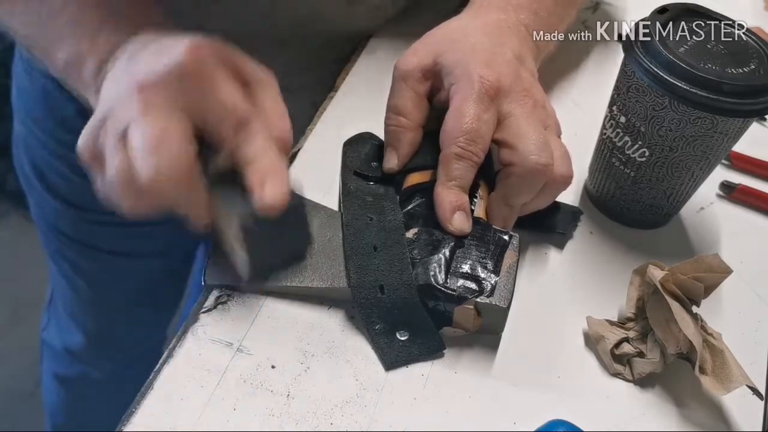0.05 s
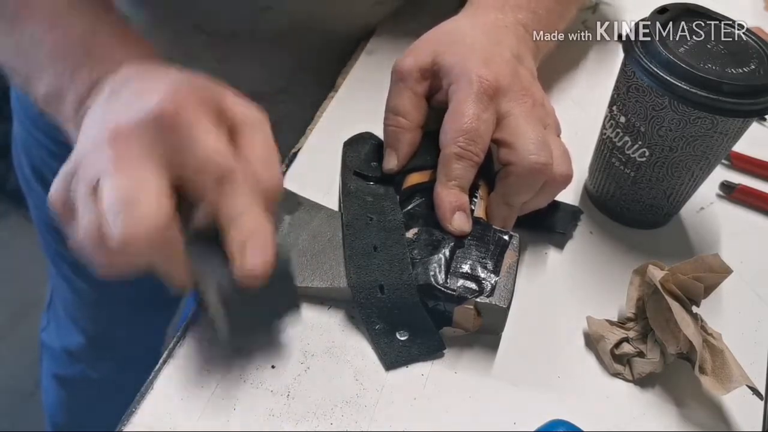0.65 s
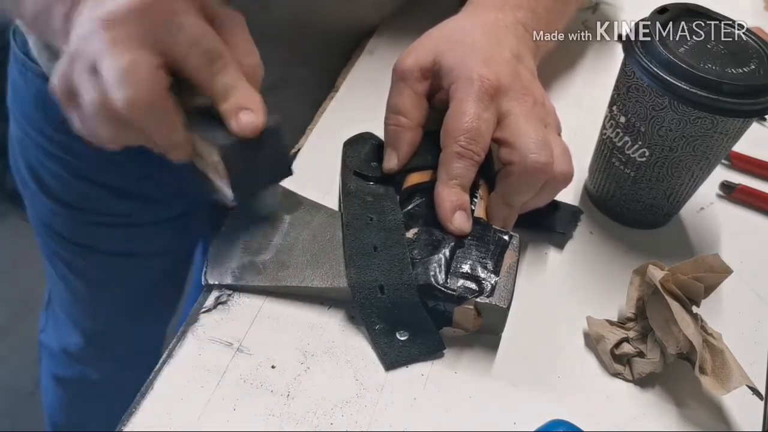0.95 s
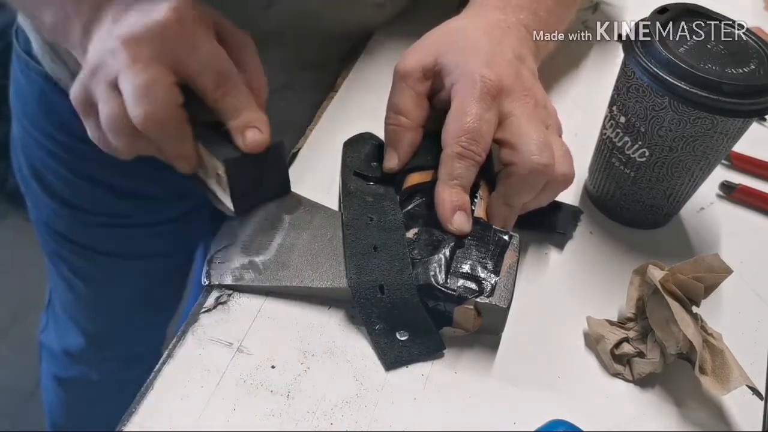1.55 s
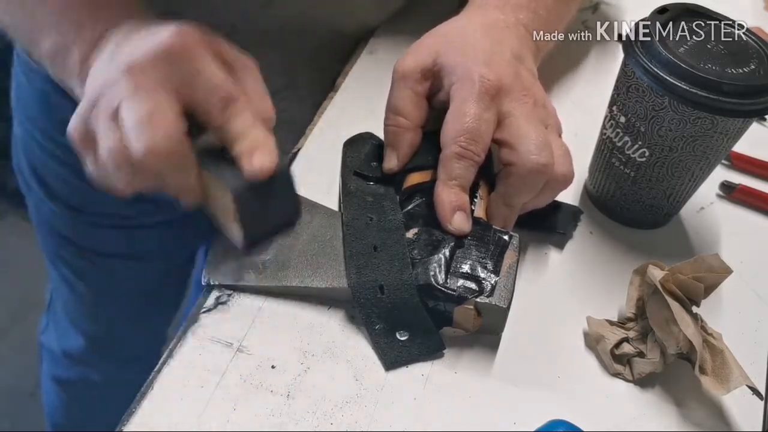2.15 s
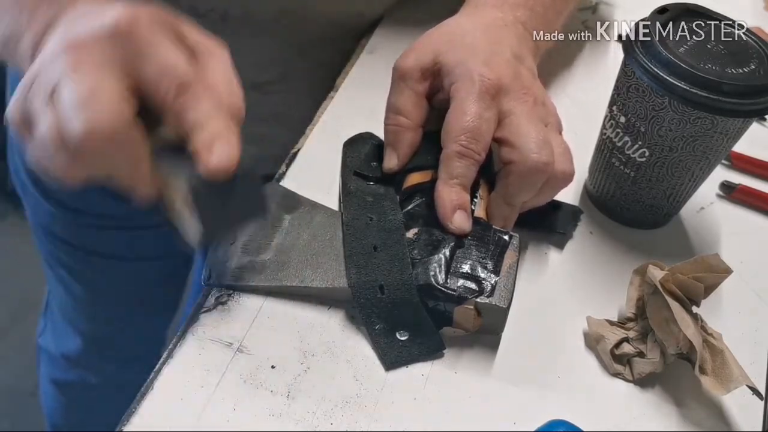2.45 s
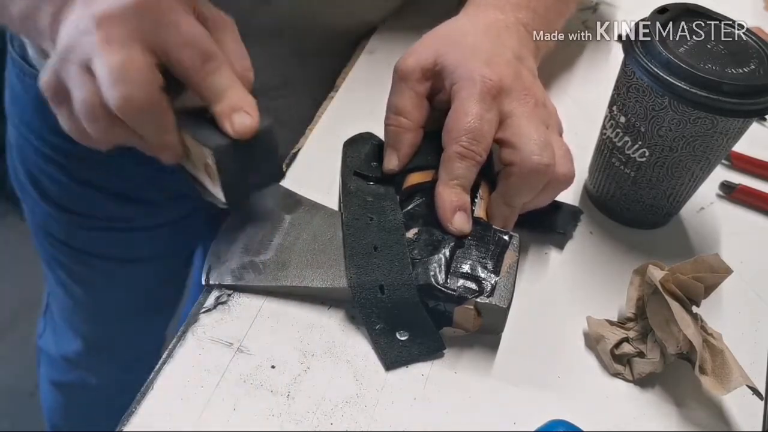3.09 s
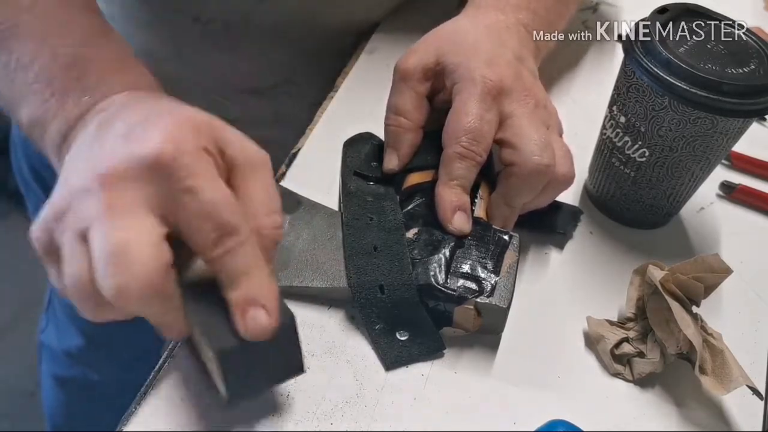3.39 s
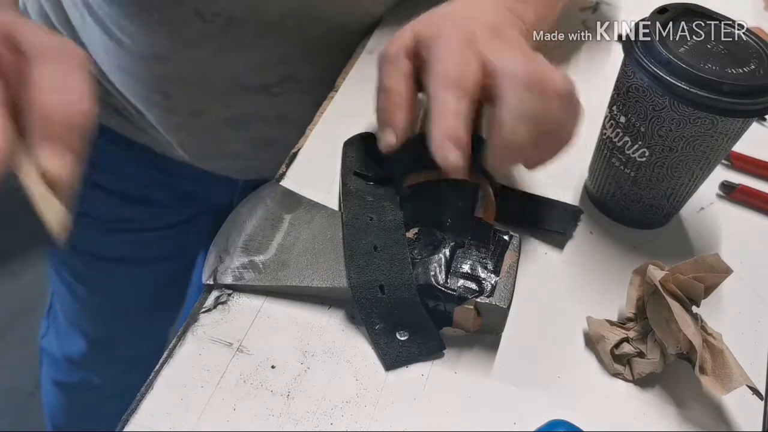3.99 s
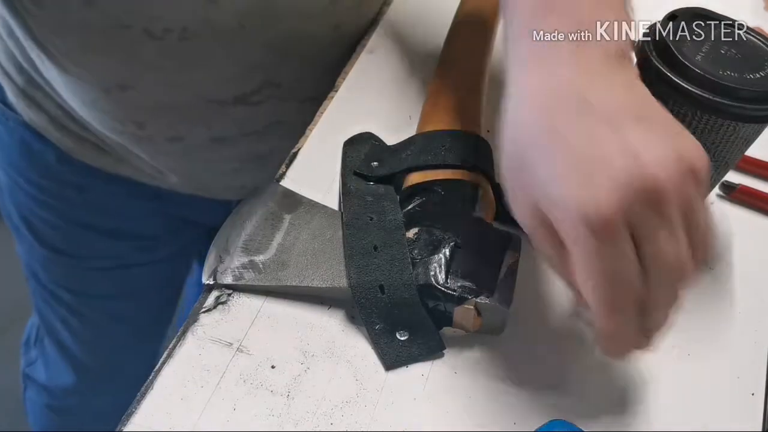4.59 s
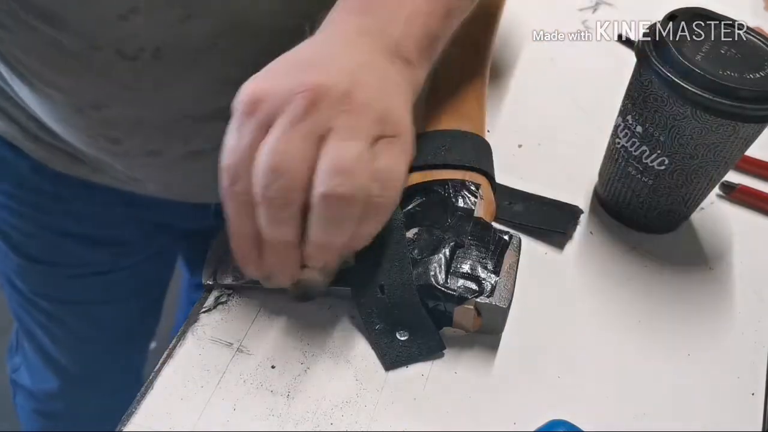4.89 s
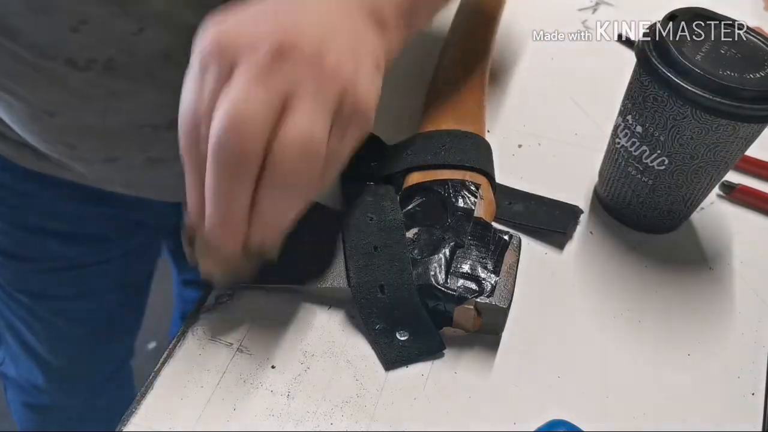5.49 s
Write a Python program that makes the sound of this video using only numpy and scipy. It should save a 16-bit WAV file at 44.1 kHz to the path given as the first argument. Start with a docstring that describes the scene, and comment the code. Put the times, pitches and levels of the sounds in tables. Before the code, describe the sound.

Close up in a small workshop, an axe head is sanded by hand in eight quick, regular strokes. Each begins with a sharp clack, a short steel ring and a bench thud, then runs into a fine, scratchy hiss with an occasional tick of grit. Afterwards come a few quiet bumps, a hand sliding over the bench and an airy wipe of a pad across the steel, over a soft rumble and faint hums.

```python
"""Sanding an axe head

Eight times a sanding block clacks onto a steel axe head, which rings and thuds into the workbench,
and is pushed off the edge, its grit hissing, rasping and now and then snapping. Then the hands let go,
the handle bumps the bench, and a soft pad is fetched and brushed over the blade.
It all plays close up in a small room, over a soft rumble and low hums that come and go."""
import sys
import numpy as np
from scipy import signal
from scipy.fft import rfft, irfft, next_fast_len
from scipy.io import wavfile
from scipy.ndimage import uniform_filter1d, map_coordinates

SR = 44100
rng = np.random.default_rng(int(sys.argv[2]) if len(sys.argv) > 2 else 0)


def output_pcm(signal):
    """Save a mono or channel-first signal as 16-bit PCM at the path in sys.argv[1].

    Samples are clipped to [-1, 1] before scaling.
    """
    pcm = np.clip(np.atleast_2d(signal).T, -1, 1) * 32767
    wavfile.write(sys.argv[1], SR, np.round(pcm).astype(np.int16))


N = 248718
TIME = np.arange(N) / SR

# the workshop's rumble: f/Hz, level/dB
RUMBLE_SPECTRUM = [(20, 2), (50, 0.5), (90, -2), (130, -9), (280, -9.5), (400, -18), (1400, -23),
                   (2500, -28.5), (5000, -30.5), (10000, -45), (16000, -49.5)]
# low hums: start/s, end/s, f/Hz, level/dB
LOW_HUMS = [(0, 0.203, 77, -42), (2.948, 3.8, 77.1, -62), (4.35, 5.64, 50, -62), (5.6, 5.64, 78, -53)]
# handle and hands bump the bench: t/s, level/dB, f/Hz, t60/s
BENCH_BUMPS = [(4.078, -45.5, 200, 0.066), (4.215, -46.5, 139, 0.19), (4.251, -53, 154, 0.057),
               (4.432, -38, 205, 0.19), (4.458, -36, 192, 0.083), (4.475, -43.5, 318.5, 0.12),
               (4.62, -41.5, 168, 0.076), (4.664, -46, 91, 0.14), (4.68, -42, 45.5, 0.34)]
# block, fingers or pad catch on an edge: middle t/s, level/dB, centre f/Hz, half length/s
EDGE_SCUFFS = [(4, -53.5, 1470, 0.0056), (4.614, -53, 736, 0.031), (4.692, -51.5, 1770, 0.02),
               (5.023, -52.5, 740, 0.015), (5.485, -61.5, 1730, 0.019)]
# the hand slides over the bench for the pad: t/s, hiss/dB, rub/dB
FETCH_LEVELS = [(4.42, -69, -82), (4.474, -63, -57.5), (4.54, -53, -58.5), (4.606, -45, -49.5),
                (4.666, -48.5, -53), (4.692, -45.5, -49), (4.722, -56, -57), (4.762, -55, -60.5),
                (4.95, -51.5, -60.5)]
# the pad wipes the blade: t/s, hiss/dB, rub/dB
WIPE_LEVELS = [(4.965, -51, -67), (4.977, -47, -65), (5.013, -41.5, -52), (5.143, -48.5, -57.5),
               (5.171, -41.5, -53), (5.231, -38.5, -54.5), (5.281, -44.5, -55.5), (5.391, -37.5, -64),
               (5.469, -41, -61.5), (5.479, -47, -65), (5.549, -64, -74), (5.601, -52, -63),
               (5.63, -56, -75)]
# the airy brush of the pad, also the colour of snapping grains: f/Hz, level/dB
BRUSH_SPECTRUM = [(1500, -31.5), (3500, -2), (6000, 5), (8500, 2), (10500, -3), (13000, -5.5),
                  (16000, -8.5)]
# the fuller rub of hand and pad: f/Hz, level/dB
RUB_SPECTRUM = [(100, -35), (300, -1), (450, -9), (720, -0.5), (1000, -1), (1500, -3.5), (2200, -1),
                (2800, -2), (5000, 2.5), (9000, -23)]
# single grains snap: t/s, level/dB
GRAIN_SNAPS = [(2.2755, -31), (2.4165, -26), (3.8645, -31), (3.9205, -24), (4.144, -57), (4.211, -55),
               (4.887, -36), (5.540, -46), (5.591, -50)]
# the block lands: t/s, level/dB, relative bench thud/dB, relative block ring/dB,
# relative blade ring in the next stroke/dB, hardness/(dB per octave)
BLOCK_LANDINGS = [(0.0627, -15, -19.5, -3, 0, -2), (0.644, -15.5, -19, 0, -0.5, 0.7),
                  (1.186, -17, -15, -2.5, -4.5, -0.1), (1.714, -18.5, -18.5, -9.5, -5.5, -1.5),
                  (2.229, -15, -15.5, -1, -3.5, -1.25), (2.751, -13, -21, 1, 1.5, 2),
                  (3.323, -16, -15, 0, -3, 0), (3.823, -14, -20, 0.5, -9, 1.5)]
# the clack of block on steel: f/Hz, level/dB
CLACK_SPECTRUM = [(60, -14.5), (220, 0), (450, -11), (650, 3.5), (1050, -8.5), (1300, -6.5), (1750, -10),
                  (2250, -12), (2750, -24), (3300, -6.5), (3750, -7.5), (4300, -19.5), (5600, -17),
                  (8000, -29), (15000, -46)]
# the block's ring, damped by the fingers: f/Hz, level/dB, t60/s
BLOCK_MODES = [(1066, -5.5, 0.011), (1980, -1, .012), (2292, -1, 0.014), (3030, -4.5, 0.013),
               (6690, -30.5, 0.018)]
# the ring of the axe head on the bench: f/Hz, level/dB, t60/s
AXE_MODES = [(699, -15, 0.081), (920, -41, 0.03), (1086, -27, 0.22), (1165, -19, 0.11), (1730, -26, 0.13),
             (1870, -50, 0.12), (2050, -29, 0.055), (2280, -31, 0.081), (2416, -31, 0.22),
             (2917, -18, 0.045), (3540, -50, .04)]
# the thud of the bench top: f/Hz, level/dB, t60/s
BENCH_MODES = [(56, -10.5, 0.25), (92.8, -15.5, 0.38), (125.6, -7, 0.31), (155.6, -8, 0.2),
               (226.4, 2.5, 0.072), (257, -4, 0.066), (332, -11, 0.14), (393, -5, .06), (478.5, -7, 0.07)]
# the push after each landing: speeds up/s, fastest/s, leaves the steel/s,
# hiss/dB, rasp/dB, starting pressure/dB
SANDING_STROKES = [(0.108, 0.303, 0.37, -32.5, -47, -3), (0.728, 0.804, 0.9, -33, -46.5, 0),
                   (1.286, 1.37, 1.458, -30, -46, -0.5), (1.824, 1.877, 1.936, -32, -49.5, 3.5),
                   (2.324, 2.39, 2.461, -31, -47.5, -3), (2.872, 2.929, 3.039, -31.5, -48, -1.5),
                   (3.424, 3.462, 3.544, -30, -46, 0), (3.915, 3.955, 3.982, -29, -49, -1.5)]
# the grit's fine hiss: f/Hz, level/dB
HISS_SPECTRUM = [(3000, -46), (7000, -0.5), (8500, 2.5), (10000, 1), (12000, -1), (16000, -4)]
# the grit's coarse rasp: f/Hz, level/dB
RASP_SPECTRUM = [(150, -9.5), (480, -23.5), (900, -18), (1500, -20.5), (2800, -13), (3900, -6.5), (4900, 1),
                 (5600, -0.5), (6600, 0.5), (7800, -7.5), (9500, -21), (16000, -43)]
# blade resonances stirred by the grit: f/Hz, level/dB, t60/s
BLADE_MODES = [(696, -6, 0.045), (1056, 2, 0.053), (1860, -1, 0.015)]
# a stroke's stages, relative to its fastest moment: touch/dB, creep/dB, edge/dB, lifted/dB
HISS_STAGES, RASP_STAGES = (-15, -8.5, -7.5, -54), (-20, -8.5, -2, -35)
# the room's decay: f/Hz, t60/s
ROOM_DECAY = [(150, 0.34), (600, 0.35), (2300, 0.32), (10000, 0.26)]
# how alike left and right are for rubbing and rumble: f/Hz, likeness/(0-1)
STEREO_LIKENESS = [(60, 0.9), (250, 1), (1500, 0.25), (4200, 0.12), (7000, 0.7), (14000, 0.55)]
# the near, left microphone port's lift over the right: f/Hz, level/dB
LEFT_PORT_EQ = [(130, -4), (280, 1.5), (600, 2.5), (1100, 4.5), (2300, 9), (4000, 0.5), (7600, 1),
                (9000, 20), (9750, 19), (10100, 19), (10700, 23), (12000, 16.5), (14000, 15), (15300, 17)]


def amp(db):
    """Decibels to gain."""
    return 10 ** (np.asarray(db) / 20)


def unit(x):
    """x at rms 1."""
    return x / np.sqrt(np.mean(x ** 2) + 1e-20)


def along(points, hz):
    """A curve of (f/Hz, value) points, read on a log axis."""
    f, v = np.transpose(points)
    return np.interp(np.log(hz + 1), np.log(f + 1), v)


def faders(rows):
    """One smooth gain curve for each dB column, silent outside the table."""
    times, *columns = np.transpose(rows)
    gate = (TIME > times[0] - .008) * (TIME < times[-1] + .008)
    return [uniform_filter1d(amp(np.interp(TIME, times, db)) * gate, size=300) for db in columns]


def wobble(rate):
    """A smooth random curve, rate knots a second."""
    return map_coordinates(rng.standard_normal(int(N * rate / SR) + 4), [TIME * rate])


def filtered(x, response):
    """x shaped by a frequency response."""
    size = next_fast_len(N + SR // 4)
    return irfft(rfft(x, size) * response(np.fft.rfftfreq(size, 1 / SR)), size)[..., :N]


def tight_pulse(spectrum, size=4096):
    """The shortest pulse that has this spectrum (minimum phase)."""
    cepstrum = irfft(np.log(amp(along(spectrum, np.fft.rfftfreq(size, 1 / SR)))))
    cepstrum[1:size // 2] *= 2
    cepstrum[size // 2 + 1:] = 0
    return irfft(np.exp(rfft(cepstrum)))


def add(track, s, x):
    """Mix x into track at time s."""
    i = max(round(s * SR), 0)
    track[..., i:i + x.shape[-1]] += x[..., :N - i]


def spread(pair, spectrum):
    """Two unrelated signals become one coloured, partly alike stereo sound of rms 1."""
    def mid_side_eq(hz):
        width = np.arccos(np.clip(along(STEREO_LIKENESS, hz), 0, 1)) / 2
        return amp(along(spectrum, hz)) * [np.cos(width), np.sin(width)]
    mid, side = filtered(pair, mid_side_eq)
    return unit(np.array([mid + side, mid - side]))


def patchy(x, depth_db):
    """The contact patch keeps changing, so narrow bands swell and fade on their own."""
    bands = signal.stft(x, nperseg=512)[2]
    swell = uniform_filter1d(rng.standard_normal(bands.shape[1:]), size=3, axis=0)
    swell = uniform_filter1d(swell, size=16, axis=1)
    return signal.istft(bands * amp(depth_db * unit(swell)), nperseg=512)[1][:, :N]


def friction(spectrum, rate, grain_db, flutter_db, patchy_db):
    """Tiny contacts blur into a rush; rate larger grains a second stick out; the pressure flutters."""
    catches = (rng.random(N) < rate / SR) * rng.exponential(size=N)
    grains = uniform_filter1d(catches, size=24) * rng.standard_normal((2, N))
    contacts = rng.standard_normal((2, N)) + amp(grain_db) * unit(grains)
    rush = spread(patchy(contacts, patchy_db), spectrum)
    return unit(rush * amp(flutter_db * (wobble(90) + wobble(400))))


def ring(modes, t, attack_s):
    """Damped modes, at new strengths and slightly new pitches for every blow."""
    hz, db, t60 = np.transpose(modes)[:, :, None]
    vary_db, detune, phase = rng.standard_normal((3, len(modes), 1))
    waves = np.sin(2 * np.pi * (hz * (1 + 0.0095 * detune) * t + phase))
    return np.sum(amp(db + vary_db - 60 * t / t60) * waves, 0) * (1 - np.exp(-t / attack_s))


def room_tone(rumble_db=-61, fade_db_per_s=214):
    """Wavering low hums fade in and out over the soft rumble of the workshop."""
    out = amp(rumble_db) * spread(rng.standard_normal((2, N)), RUMBLE_SPECTRUM) * amp(wobble(5.81))
    waver = .5 * wobble(7)
    for start, end, hz, db in LOW_HUMS:
        outside_s = np.abs(TIME - np.clip(TIME, start, end))
        out += amp(db - fade_db_per_s * outside_s) * np.sin(2 * np.pi * hz * TIME + waver)
    return out


def bumps(thump_db=-8, sag=0.12):
    """Soft contacts thump and stir one low note of the wood, which sags as the pressure eases."""
    out, t = np.zeros((2, N)), np.arange(SR // 3) / SR
    for s, db, hz, t60 in BENCH_BUMPS:
        lowpass = signal.butter(2, hz, fs=SR, output="sos")
        thump = unit(signal.sosfilt(lowpass, rng.standard_normal((2, len(t)))))
        pitch_hz = hz * (1 + sag * np.exp(-t / 0.021))
        tone = np.sin(2 * np.pi * np.cumsum(pitch_hz) / SR)
        envelope = amp(db - 60 * t / t60) * (1 - np.exp(-t / 0.002))
        add(out, s, envelope * (tone + amp(thump_db) * thump))
    return out


def scuffs():
    """A brief catch of soft on hard: a hollow burst that swells and dies."""
    out = np.zeros((2, N))
    for s, db, hz, half_s in EDGE_SCUFFS:
        hollow = [(hz / 2, -20), (hz, 0), (hz * 2, -20)]
        swell = amp(db) * np.exp(-((TIME - s) / half_s) ** 2)
        out += swell * spread(rng.standard_normal((2, N)), hollow)
    return out


def wiping(brush_db=-11, rub_db=0):
    """Hand and soft pad slide over bench and blade: an airy brush on top of a fuller rub."""
    brush_gain, rub_gain = np.add(faders(FETCH_LEVELS), faders(WIPE_LEVELS))
    brush = friction(BRUSH_SPECTRUM, rate=140, grain_db=-11.5, flutter_db=0.74, patchy_db=3.5)
    rub = friction(RUB_SPECTRUM, rate=140, grain_db=-8.5, flutter_db=0.7, patchy_db=3.5)
    return amp(brush_db) * brush_gain * brush + amp(rub_db) * rub_gain * rub


def snaps(trim_db=-7, t60=.012):
    """A grain catches and lets go with a tiny, bright tick."""
    out, t = np.zeros((2, N)), np.arange(SR // 50) / SR
    for s, db in GRAIN_SNAPS:
        add(out, s, amp(db + trim_db - 60 * t / t60) * rng.standard_normal((2, len(t))))
    return filtered(out, lambda hz: amp(along(BRUSH_SPECTRUM, hz)))


def clack_pulse(hardness):
    """The transient of one landing, peak 1: the harder the contact, the brighter."""
    pulse = tight_pulse([(hz, db + hardness * np.log2(hz)) for hz, db in CLACK_SPECTRUM])
    return pulse / np.abs(pulse).max()


def landings(clack_db=-8, crack_db=-27, block_db=1, scatter_db=-1, axe_db=-8, bench_db=1):
    """The hard block clacks; the held axe head rings briefly and thuds into the bench."""
    out, t = np.zeros((2, N)), np.arange(SR // 3) / SR
    for s, db, thud_db, ring_db, _, hardness in BLOCK_LANDINGS:
        clack = clack_pulse(hardness)
        add(out, s, amp(db + clack_db) * clack)
        # grit is crushed in the first few milliseconds
        add(out, s, amp(db + crack_db - 60 * t / 0.0087) * rng.standard_normal((2, len(t))))
        add(out, s, amp(db + block_db + ring_db) * ring(BLOCK_MODES, t, attack_s=0.0015))
        # bench top, hands and tools scatter the clack for a few hundredths of a second
        scatter = rng.standard_normal((3, len(t))) * amp(-60 * t / 0.1) * (1 - np.exp(-t / 0.001))
        scatter = scatter[2] + 2.7 * scatter[:2]  # a centre under a wide pair
        scatter /= np.linalg.norm(scatter[0])
        add(out, s, amp(db + scatter_db) * signal.fftconvolve(scatter, clack[None], axes=1))
        add(out, s, amp(db + axe_db) * ring(AXE_MODES, t, attack_s=0.00068))
        add(out, s, amp(db + thud_db + bench_db) * ring(BENCH_MODES, t, attack_s=0.0034))
    return out


def stroke_gain(start, speeds_up, fastest, leaves, press_db, stages, bite_s=0.036, lift_s=0.053):
    """One stroke's envelope: the grit bites, the block creeps, speeds up, runs off the edge and lifts."""
    touch_db, creep_db, edge_db, lifted_db = stages
    times = [start, start + bite_s, speeds_up, fastest, leaves, leaves + lift_s]
    levels_db = [touch_db, creep_db + press_db, creep_db + press_db, 0, edge_db, lifted_db]
    gate = (TIME > start) * (TIME < leaves + lift_s)
    return amp(np.interp(TIME, np.maximum.accumulate(times), levels_db)) * gate


def sanding(hiss_trim_db=-12, rasp_trim_db=5, blade_db=-11, uneven_db=0.57):
    """Grit cuts the steel: a fine hiss, and a coarser rasp that also stirs the blade's resonances."""
    starts, *_, freedom_db, _ = np.transpose(BLOCK_LANDINGS)
    hiss_gain, rasp_gain = np.zeros((2, N))
    for start, (*moments, hiss_db, rasp_db, press_db) in zip(starts, SANDING_STROKES):
        hiss_gain += amp(hiss_db) * stroke_gain(start, *moments, press_db, HISS_STAGES)
        rasp_gain += amp(rasp_db) * stroke_gain(start, *moments, press_db, RASP_STAGES)
    hiss = friction(HISS_SPECTRUM, rate=220, grain_db=-12, flutter_db=1.1, patchy_db=2.5)
    rasp = friction(RASP_SPECTRUM, rate=520, grain_db=-10.5, flutter_db=0.8, patchy_db=2.5)
    blade_ping = ring(BLADE_MODES, np.arange(SR // 10) / SR, attack_s=0.00028)
    blade = unit(signal.fftconvolve(rasp, blade_ping[None], axes=1)[:, :N])
    # the grip on the axe, and so the freedom of the blade to ring, changes from stroke to stroke
    freedom = amp(freedom_db)[np.maximum(np.searchsorted(starts, TIME) - 1, 0)]
    ringing_rasp = amp(rasp_trim_db) * rasp + amp(blade_db) * freedom * blade
    hand_pressure = amp(uneven_db * wobble(rate=35))
    return hand_pressure * (amp(hiss_trim_db) * hiss_gain * hiss + rasp_gain * ringing_rasp)


def room(x, wet_db, echo_db, echo_s):
    """A short diffuse tail and one slap from a wall."""
    hz, t, bands = signal.stft(rng.standard_normal((2, SR // 2)), SR, nperseg=256)
    envelope = amp(-60 * t / along(ROOM_DECAY, hz)[:, None]) * (1 - np.exp(-t / 0.0063))
    tail = signal.istft(bands * envelope, SR, nperseg=256)[1]
    diffuse = signal.fftconvolve(x, tail / np.linalg.norm(tail[0]), axes=1)[:, :N]
    slap = filtered(x, lambda hz: np.exp(-2j * np.pi * hz * echo_s))
    return amp(wet_db) * diffuse + amp(echo_db) * slap


def scene():
    """The work on the bench and its reverb, over the room tone."""
    work = landings() + sanding() + snaps() + wiping() + scuffs() + bumps()
    return work + room(work, wet_db=-11, echo_db=-23.0, echo_s=.045) + room_tone()


def record(dry, lag_ms=0.11, top_hz=15900):
    """The left port rings in the high treble, the right hears a touch later; the top is cut steeply."""
    left = signal.fftconvolve(dry[0], tight_pulse(LEFT_PORT_EQ))[:N]
    right = filtered(dry[1], lambda hz: np.exp(-2j * np.pi * hz * lag_ms * 1e-3))
    return filtered(np.array([left, right]), lambda hz: 1 / np.sqrt(1 + (hz / top_hz) ** 240))


dry = scene()
out = record(dry)
output_pcm(out)
```